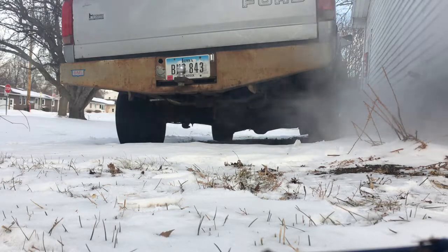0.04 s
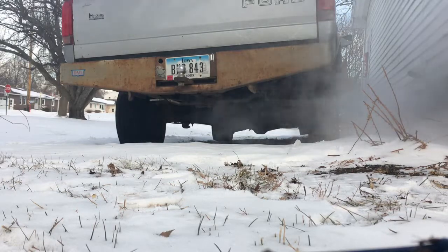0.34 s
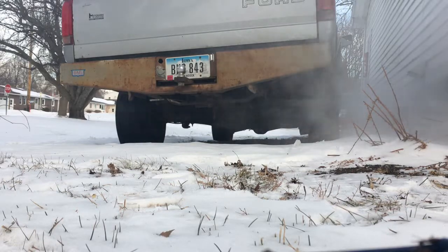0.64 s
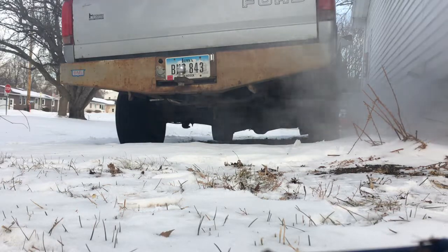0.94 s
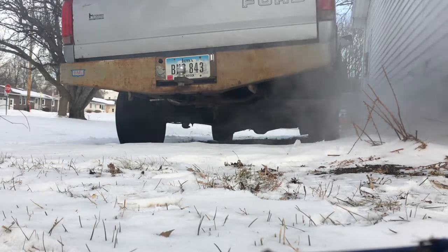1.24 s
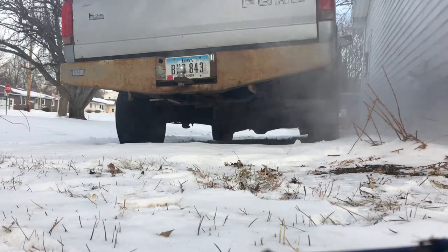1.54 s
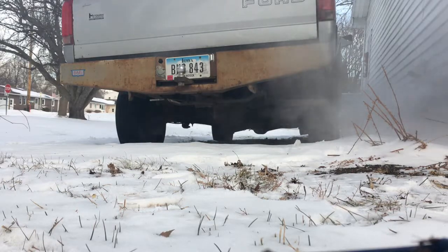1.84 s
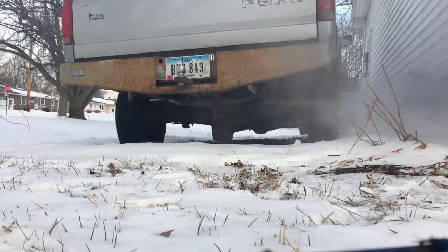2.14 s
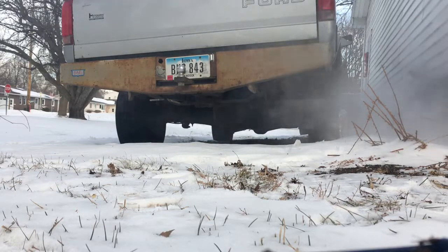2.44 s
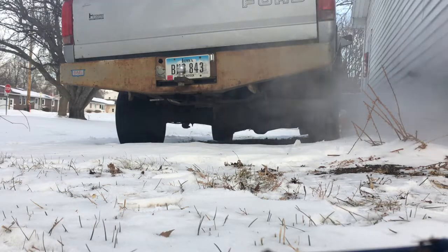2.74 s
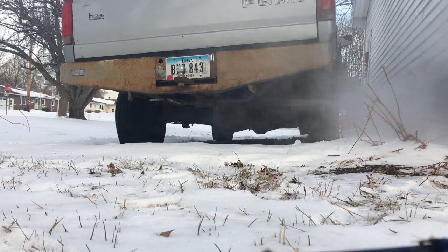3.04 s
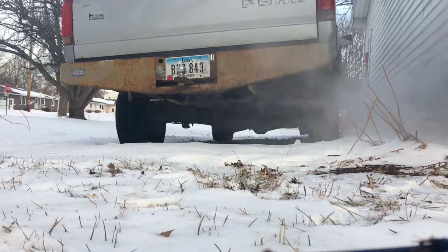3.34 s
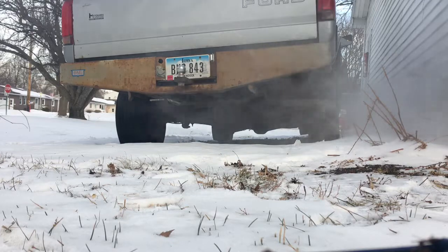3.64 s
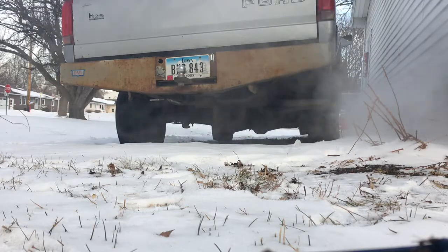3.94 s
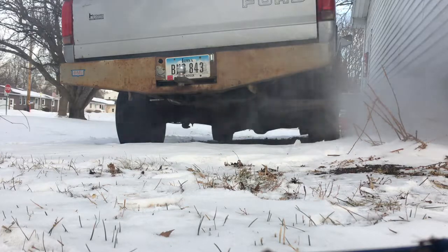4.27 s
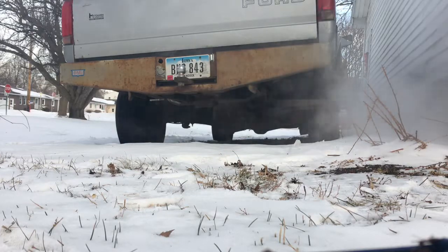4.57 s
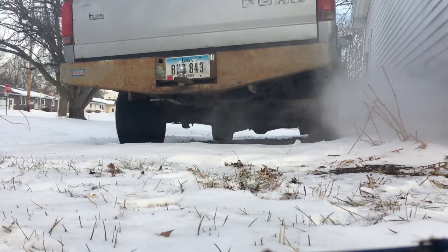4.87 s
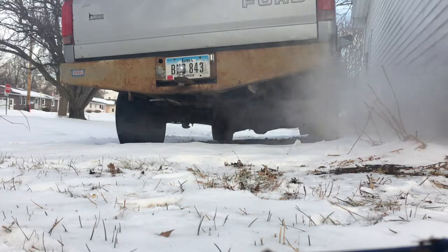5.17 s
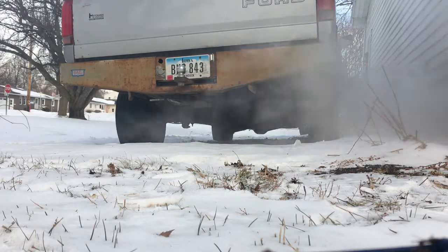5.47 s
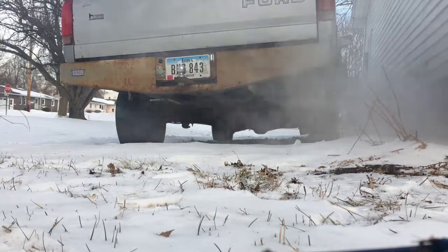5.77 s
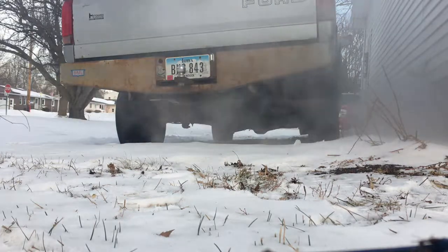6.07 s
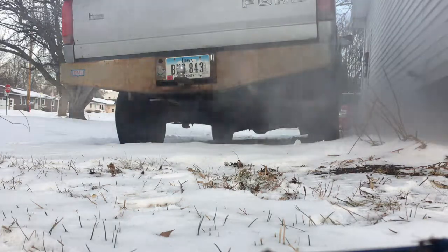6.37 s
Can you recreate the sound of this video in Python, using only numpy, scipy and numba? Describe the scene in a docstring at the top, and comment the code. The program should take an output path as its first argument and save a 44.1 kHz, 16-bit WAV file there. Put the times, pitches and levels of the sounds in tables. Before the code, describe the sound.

A big V8 pickup idles with a low exhaust rumble, then is revved three short times with hissing, cracking pipes.

```python
"""A snowy yard, behind the tailpipes of an old V8 pickup: it idles, then is blipped three times.
Eight unequal cylinders pulse through the resonant exhaust; gas rushes out in puffs, a leak spits
once a cycle and faint whines drift. Under throttle the pipes hiss and crack as pulses steepen
into shocks; on the overrun they burble unevenly."""
import sys
import numpy as np
from scipy.fft import rfft, irfft, next_fast_len
from scipy.io import wavfile
from scipy.ndimage import map_coordinates
from numba import njit

SR = 44100
rng = np.random.default_rng(int(sys.argv[2]) if len(sys.argv) > 2 else 0)


def inscribe(sig):
    """Save sig as 16-bit PCM at rate SR to the path in sys.argv[1].

    A 1-D sig is mono; a 2-D sig holds one channel per row.
    Samples are clipped to [-1, 1] before scaling.
    """
    pcm = np.round(np.clip(np.atleast_2d(sig).T, -1, 1) * 32767)
    wavfile.write(sys.argv[1], SR, pcm.astype(np.int16))


N = 291501


def amp(db):
    """Decibels to gain."""
    return 10 ** (np.asarray(db) / 20)


def unit(x):
    """Scale to rms 1."""
    return x / np.sqrt(np.mean(x ** 2) + 1e-20)


def white():
    """Fresh white noise."""
    return rng.standard_normal(N)


def wobble(rate_hz):
    """Smooth random curve, rate_hz knots a second."""
    knots = rng.standard_normal(int(N * rate_hz / SR) + 4)
    return map_coordinates(knots, [np.arange(N) * rate_hz / SR])


def ramps(events, rise_s, fall_s):
    """Rise, hold and fall for each (start [s], end [s], size)."""
    t = np.arange(N) / SR
    return sum(size * np.clip((t - on) / rise_s, 0, 1) * np.clip(1 - (t - off) / fall_s, 0, 1)
               for on, off, size, *_ in events)


def swells(events):
    """Bell-shaped gain for each (time [s], half length [s], level [dB])."""
    t = np.arange(N) / SR
    return sum(amp(db) * np.exp(-((t - s) / half_s) ** 2) for s, half_s, db in events)


def bursts(events, t60_s):
    """Jump and decay for each (time [s], level [dB])."""
    envelope, t = np.zeros(N + SR), np.arange(SR // 10) / SR
    for s, db in events:
        envelope[round(s * SR):][:len(t)] += amp(db - 60 * t / t60_s)
    return envelope[:N]


def filtered(x, response):
    """Apply a frequency response."""
    size = next_fast_len(N + SR // 2)
    return irfft(rfft(x, size) * response(np.fft.rfftfreq(size, 1 / SR)), size)[:N]


def resonances(modes, hz):
    """Causal response of modes of alternating sign."""
    return sum((-1) ** k * amp(db) * 1j * hz * width / (centre ** 2 - hz ** 2 + 1j * hz * width)
               for k, (centre, width, db) in enumerate(modes))


@njit
def flywheel(push, drag, catch_hz):
    """Firing rate above idle: throttle drives it up, friction brings it back, easing near idle."""
    above_hz = np.zeros(len(push))
    for n in range(1, len(push)):
        above_hz[n] = above_hz[n - 1] + push[n] - drag * np.tanh(above_hz[n - 1] / catch_hz)
    return above_hz


# Creeping idle: (time [s], firing rate [Hz])
IDLE_RATE = [(0, 104.94), (2.2, 108.95), (4.3, 112.21)]
# Throttle blips: (pressed [s], released [s], opening [0-1])
THROTTLE_BLIPS = [(4.3141, 4.5598, .703), (5.1875, 5.4318, 1), (6.2518, 6.611, .917)]
OPEN_S, CLOSE_S, FULL_LOAD_OPENING = .163, .14, 0.7
PUSH_HZ_PER_S, DRAG_HZ_PER_S = 537.8, 129.95
OVERRUN_ABOVE_IDLE_HZ, FAST_ABOVE_IDLE_HZ = 12.2, 89


def engine():
    """Throttle spins the crank: firing rate, load, and a function from load to engine state."""
    idle_hz = np.interp(np.arange(N) / SR, *np.transpose(IDLE_RATE))
    opening = ramps(THROTTLE_BLIPS, OPEN_S, CLOSE_S)
    above_hz = flywheel(PUSH_HZ_PER_S / SR * opening, DRAG_HZ_PER_S / SR, catch_hz=22.25)
    revs = above_hz / FAST_ABOVE_IDLE_HZ
    creep = ((idle_hz - idle_hz[0]) / (idle_hz[-1] - idle_hz[0])) ** 2

    def state_at(load):
        overrun = np.clip(1 - load, 0, 1) * np.tanh(above_hz / OVERRUN_ABOVE_IDLE_HZ)
        return np.array([np.ones(N), load, overrun, load * revs, overrun * revs, creep])

    return idle_hz + above_hz, np.clip(opening / FULL_LOAD_OPENING, 0, 1), state_at


def follow(amounts, state):
    """Weight the state by (idle value, + load, + overrun, + fast load, + fast overrun, + creep)."""
    return np.array(amounts) @ state[:len(amounts)]


# Cylinders in firing order: (blow [dB], lateness [firing intervals], gas puff [dB])
CYLINDERS = [(-2.0, -0.02, 0.0), (0.3, -0.16, 1.0), (0.5, -0.15, 2.0), (-2.5, 0.03, 0.0),
             (-4.9, -0.02, -2.0), (1.1, -0.16, 2.0), (1.2, -0.17, 0.0), (-3.5, -0.07, 1.0)]
# Idle spectrum, used for the weak orders: (order [x cycle rate], relative level [dB])
IDLE_ORDERS = [(1, -64), (2, -58), (3, -29), (4, -27), (5, -13), (6, -23), (7, -20), (8, 0), (9, -17),
               (10, -24), (11, -18), (12, -23), (13, -12), (14, -18), (15, -21), (16, -21), (17, -22),
               (18, -33), (19, -26), (20, -30), (21, -29), (22, -27), (23, -33), (24, -32), (25, -37),
               (26, -39), (27, -38), (28, -43), (29, -40), (30, -46), (31, -47), (32, -53), (33, -48),
               (34, -50), (35, -51), (36, -56)]
# Long pipe modes, phase only: (frequency [Hz], width [Hz], level [dB])
PIPE_MODES = [(58.0, 15.0, -28.0), (141.0, 35.0, -5.0), (159.0, 26.0, -0.0), (217.0, 20.0, -9.0),
              (314.0, 44.0, -19.0), (311.0, 77.0, -24.0)]
# Muffler chamber modes: (frequency [Hz], width [Hz], level [dB])
MUFFLER_MODES = [(44.4, 9.2, -8), (83, 29.6, -2), (174.3, 56, -1), (206, 34.8, 1), (279, 46, -9),
                 (318.6, 49.5, -11), (408, 77, -25)]
# Pipe boom on the strong orders: (frequency [Hz], gain [dB])
PIPE_BOOM = [(39, -22.5), (47, -3.5), (55, -6), (68, -9), (85, -7.5), (107, 0), (125, -4), (150, -8.5),
             (220, -13.5)]
# Per strong order: (idle [dB], + load [dB], + overrun [dB], + fast load [dB], + fast overrun [dB])
STRONG_DB = [(-25.5, 5.2, 11.5, 11.5, -1.5), (-18.5, 5.9, 2.5, -1, 0.5), (-30, 9, 7, -3.5, 5),
             (-13.5, 10.3, -8.5, -1.5, -1)]
STRONG_ORDERS = (3, 5, 6, 8)
RUMBLE_DB = (-22.5, 9.5, -2.5, -3.5, -0.5, 2)  # terms as in follow()
UNEVEN_SHARE = (0.11, 0.32, 0.87)


def exhaust_note(cycle_hz, cycles, uneven, state):
    """Repeating part of the pulse train: orders of the cycle glide through the pipe resonances."""
    boom_hz, boom_db = np.transpose(PIPE_BOOM)
    blow_db, late, _ = np.transpose(CYLINDERS)
    fire_at = (np.arange(len(late)) + late + .5) / len(late)
    grid_hz = np.arange(1, 1200)
    pipe = resonances(PIPE_MODES, grid_hz)
    muffler = np.abs(resonances(MUFFLER_MODES, grid_hz))
    idle_hz = cycle_hz[2 * SR]
    turn = np.exp(2j * np.pi * cycles)
    phasor, strong, weak, weak_power = np.ones(N, complex), 0, 0, 0
    for order, (_, db) in enumerate(IDLE_ORDERS, 1):
        phasor = phasor * turn
        hz = order * cycle_hz
        # uneven firing of the two banks sets the phases: the lope
        pattern = -np.sum(amp(blow_db) * np.exp(-2j * np.pi * order * fire_at))
        response = np.interp(hz, grid_hz, pipe) * pattern
        wave = np.sqrt(2) * (phasor * response).real / np.abs(response)
        if order in STRONG_ORDERS:
            surge_db = 3.2 * uneven ** 1.5 * wobble(22) + .35 * wobble(9)  # ragged combustion
            order_db = follow(STRONG_DB[STRONG_ORDERS.index(order)], state)
            strong += amp(order_db + np.interp(hz, boom_hz, boom_db) + surge_db) * wave
        else:
            gain = amp(db) * np.interp(hz, grid_hz, muffler) / np.interp(order * idle_hz, grid_hz, muffler)
            weak += gain * wave
            weak_power += gain ** 2
    return strong + amp(follow(RUMBLE_DB, state)) * np.sqrt(1 - uneven) * weak / np.sqrt(weak_power)


def burble(firings, uneven, state, trim_db):
    """No two firings burn alike: their random excess thumps through the muffler."""
    onsets = np.flatnonzero(np.diff(np.floor(firings + .5)))
    blows = np.zeros(N)
    blows[onsets] = 2 * rng.random(len(onsets)) - 1
    thumps = unit(filtered(blows, lambda hz: resonances(MUFFLER_MODES, hz)))
    return amp(follow(RUMBLE_DB, state) + trim_db) * np.sqrt(uneven) * thumps


def puffs(firings, lead, fade, base, scatter_db):
    """Gas flow: one puff per firing, sized by its cylinder; lead and fade in firing intervals."""
    count, age = np.divmod(firings + lead, 1)
    count = count.astype(int)
    size_db = np.array(CYLINDERS)[count % len(CYLINDERS), 2]
    size_db += scatter_db * rng.standard_normal(N // 100)[count]
    return base + amp(size_db) * (1 - np.exp(-age * 10)) * np.exp(-age / fade)


def cyclic_noise(cycles, share, size=512):
    """Turbulence of which a share repeats every cycle, giving it a pitch."""
    knots = rng.standard_normal((int(cycles[-1]) + 2, size))
    knots = np.sqrt(share) * knots[-1] + np.sqrt(1 - share) * knots[:-1]
    return np.interp(cycles * size, np.arange(knots.size), knots.ravel())


# Tailpipe mouth modes: (frequency [Hz], width [Hz], lift [dB])
MOUTH_MODES = [(623, 17, -1), (894, 44, -1.5), (1026, 59, 3.5), (1179, 8.7, 12.5), (1987, 23, 8.5),
               (2410, 46, 4), (3270, 49, 2.5), (3620, 50, 5.5), (3920, 100, 5), (4330, 100, 4),
               (5750, 77, 4.5), (6230, 110, -1), (6710, 180, 4.5), (8040, 200, 3.5), (9320, 420, 3.5),
               (11180, 280, 3.5)]


def rush(spectrum, turbulence):
    """Turbulence coloured by a spectrum and the pipe mouths, at rms 1."""
    points_hz, db = np.transpose(spectrum)
    grid_hz = np.arange(0, SR // 2, 5)
    lift_db = sum(lift / (1 + (2 * (grid_hz - hz) / width) ** 2) for hz, width, lift in MOUTH_MODES)
    gain = amp(np.interp(np.log(grid_hz + 1), np.log(points_hz), db, left=-120) + lift_db)
    return unit(filtered(turbulence, lambda hz: np.interp(hz, grid_hz, gain)))


# Gas driven out by the blips: (start [s], end [s], strength [0-1], crack phase [cycles], crack [dB])
GAS_BLASTS = [(4.357, 4.521, 0.83, .81, -7.5), (5.211, 5.443, 0.82, .635, -0.5), (6.3, 6.611, 0.95, .76, 0)]
# Rasp, slack flow: (frequency [Hz], level [dB])
SLACK_RASP = [(280, -26), (470, -1.5), (558, -7.5), (612, -3.5), (854, -11), (941, -11), (1090, -17),
              (1700, -34.5), (2210, -28.5), (3740, -120)]
# Rasp, hard flow: (frequency [Hz], level [dB])
HARD_RASP = [(250, -10.5), (430, -2), (560, -12), (678, -5), (831, -9), (943, -5.5), (1190, -14),
             (1450, -22.5), (1800, -20), (2340, -32), (3960, -120)]
# Rasping flutter on the overrun: (time [s], half length [s], level [dB])
FLUTTERS = [(4.69, 0.064, -40), (5.66, .05, -37.5), (5.9, 0.059, -41.5)]
RASP_DB = (-49.5, 20.5, 1.5, 3, 4.5, 4)
LOPE_DB, LOPE_PEAK_CYCLES = 2.5, 0.86


def rasp(firings, cycles, force, gas_state, state_at):
    """Puffs of gas rasp in the pipes; off idle the level swings once a cycle."""
    flow = puffs(firings, lead=.1, fade=.4, base=.28, scatter_db=1.4)
    slack = rush(SLACK_RASP, flow * cyclic_noise(cycles, share=0.45))
    hard = rush(HARD_RASP, flow * cyclic_noise(cycles, share=0.28))
    blend = amp(-2.5) * np.sqrt(1 - force) * slack + np.sqrt(force) * hard
    level_db = follow(RASP_DB, state_at(ramps(GAS_BLASTS, rise_s=0.13, fall_s=0.13) ** 0.64))
    load, overrun = gas_state[1:3]
    lope = amp(LOPE_DB * (load + overrun) * np.cos(2 * np.pi * (cycles - LOPE_PEAK_CYCLES)))
    return lope * (amp(level_db) * blend + swells(FLUTTERS) * hard)


# Hiss, slack flow: (frequency [Hz], level [dB])
SLACK_HISS = [(820, -18.5), (1400, -3.5), (1840, -10.5), (1960, -8), (4360, -3), (4820, -4.5), (5790, -1.5),
              (7540, -4.5), (9420, -2), (10400, -6), (11300, -3.5), (14100, -4), (15800, -17)]
# Hiss, hard flow: (frequency [Hz], level [dB])
HARD_HISS = [(820, -16), (1400, -5.5), (1660, -24), (1960, -7.5), (2230, -11), (2420, -6), (4140, -4.5),
             (4680, -6.5), (5850, -0.5), (7090, -1.5), (9140, 0), (13400, -4.5), (15800, -11.5)]
# Thin hiss of air and leak: (frequency [Hz], level [dB])
THIN_HISS = [(2500, -31), (4000, -17.5), (7000, -4), (9500, -2.5), (13500, 2), (15800, -5)]
HISS_DB = (-49.5, 24, 4, 1, -3.5, 3.5)
AIR_DB = (-60.5, 4.5, 18, -0.5, -20, 3.5)


def hiss(firings, force, gas_state):
    """Escaping gas hisses, pulsing deeper under throttle; thin air rises on the overrun."""
    slack_flow = puffs(firings, lead=0.51, fade=0.48, base=1.0, scatter_db=5.0)
    hard_flow = puffs(firings, lead=0.29, fade=0.72, base=0.11, scatter_db=3.5)
    slack = amp(-1.5) * np.sqrt(1 - force) * rush(SLACK_HISS, slack_flow * white())
    hard = amp(2.16) * np.sqrt(force) * rush(HARD_HISS, hard_flow * white())
    air = amp(follow(AIR_DB, gas_state)) * rush(THIN_HISS, slack_flow * white())
    return amp(follow(HISS_DB, gas_state)) * (slack + hard) + air


LEAK_DB = (-55.5, 16, 0, 1, -6, 7.5)
LEAK_PHASE_CYCLES = .59


def leak(cycles, force, gas_state):
    """In slack flow a leak spits once a cycle, and again more weakly two firings later."""
    spits = 0
    for delay_cycles, rise_cycles, size in ((0, .045, 1), (.25, .022, .55)):
        age = (cycles - LEAK_PHASE_CYCLES - delay_cycles) % 1 / rise_cycles
        spits += size * age * np.exp(-age)
    spits *= amp(np.tanh(wobble(32)))
    return np.sqrt(1 - force) * amp(follow(LEAK_DB, gas_state)) * rush(THIN_HISS, spits * white())


# Steady whines: (frequency [Hz], level [dB])
WHINES = [(603, -63), (920, -63)]
# Belt whine swells: (time [s], half length [s], level [dB])
BELT_SWELLS = [(1.7, 0.19, -62), (4.12, 0.4, -61)]


def whine(firings):
    """Faint whines drift in level; the belt's follows engine speed."""
    t = np.arange(N) / SR
    steady = 0
    for hz, db in WHINES:
        drift_db = 3 * np.tanh(wobble(2))
        steady += amp(db + drift_db) * np.sin(2 * np.pi * hz * t + 1.3 * wobble(26))
    belt = np.sin(2 * np.pi * 12 * firings + .6 * wobble(30))
    return steady + belt * swells(BELT_SWELLS)


# Modes rung by a crack: (frequency [Hz], width [Hz], level [dB])
CRACK_MODES = [(652, 93, 9), (985, 150, 10), (1860, 140, 0.5), (3110, 3000, -2), (5200, 1770, 4.5)]
CRACK_SHUT_LOSS_DB, CRACK_LOSS_DB_PER_HZ, SHOCK_DELAY_S = 30.5, 0.2, 0.001067


def cracks(firing_hz, cycles, peak_db, spray_db, bark_db):
    """Under load one pulse a cycle steepens into a shock, with a spray of hiss and a bark."""
    events = []
    for on, off, _, phase, db in GAS_BLASTS:
        opening = ramps([(on, off, 1)], rise_s=0.08, fall_s=CLOSE_S)
        for n in np.flatnonzero(np.diff(np.floor(cycles - phase))):
            if opening[n] > .5:
                shut_db = CRACK_SHUT_LOSS_DB * (1 - opening[n])
                slow_db = CRACK_LOSS_DB_PER_HZ * (firing_hz.max() - firing_hz[n])
                events.append((n / SR, db - shut_db - slow_db))
    shocks = filtered(bursts(events, t60_s=0.00042), lambda hz: resonances(CRACK_MODES, hz))
    shocks = np.roll(shocks, round(SHOCK_DELAY_S * SR)) / np.abs(shocks).max()
    bark = amp(bark_db) * bursts(events, t60_s=0.072) * rush(HARD_RASP, white())
    spray = amp(spray_db) * bursts(events, t60_s=0.026) * rush(HARD_HISS, white())
    return amp(peak_db) * shocks + spray + bark


# Gas spurts: (time [s], relative peak [dB])
GAS_SPURTS = [(4.569, -11.5), (5.247, -11), (5.289, -9.5), (6.327, -15), (6.383, -7.5)]


def spurts(gain_db):
    """Strong firings spurt gas during the blips."""
    return amp(gain_db) * bursts(GAS_SPURTS, t60_s=0.04) * rush(HARD_HISS, white())


def scene():
    """Rumble, gas, cracks and whines around one crankshaft."""
    firing_hz, load, state_at = engine()
    state = state_at(load)
    firings = np.cumsum(firing_hz) / SR
    cycles = firings / len(CYLINDERS)
    uneven = np.clip(follow(UNEVEN_SHARE, state), 0, 1)
    gas_state = state_at(ramps(GAS_BLASTS, rise_s=0.15, fall_s=.12) ** 0.63)
    force = np.clip((follow(HISS_DB, gas_state) + 41.5) / 10, 0, 1)  # 0 slack flow, 1 hard flow
    mix = exhaust_note(firing_hz / len(CYLINDERS), cycles, uneven, state)
    mix += burble(firings, uneven, state, trim_db=-1.5)
    mix += rasp(firings, cycles, force, gas_state, state_at)
    mix += hiss(firings, force, gas_state)
    mix += leak(cycles, force, gas_state)
    mix += whine(firings)
    mix += cracks(firing_hz, cycles, peak_db=-2.5, spray_db=-15, bark_db=-14.5)
    mix += spurts(gain_db=-9.5)
    return mix[None]


def record(dry, top_hz=15900):
    """The microphone rounds the highest peaks and passes nothing above its band limit."""
    rounded = dry[0] / (1 + np.abs(dry[0]) ** 8) ** (1 / 8)
    fade_in = np.minimum(np.arange(N) / (.002 * SR), 1)
    return filtered(rounded * fade_in, lambda hz: hz < top_hz)[None]


dry = scene()
out = record(dry)
inscribe(out)
```